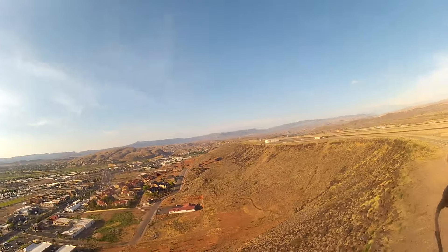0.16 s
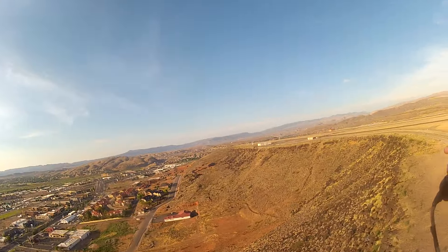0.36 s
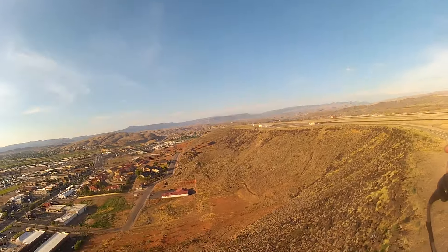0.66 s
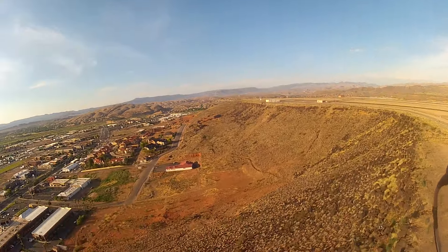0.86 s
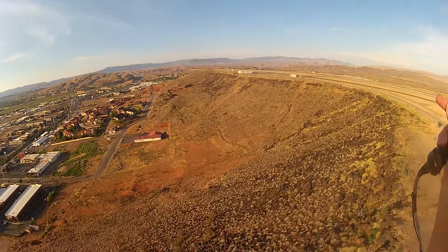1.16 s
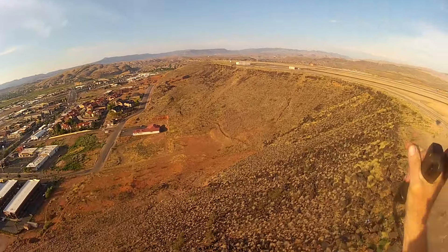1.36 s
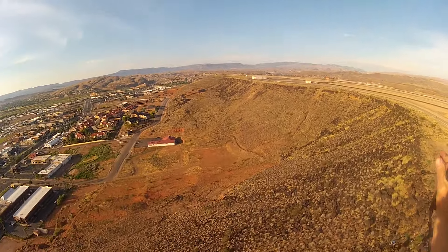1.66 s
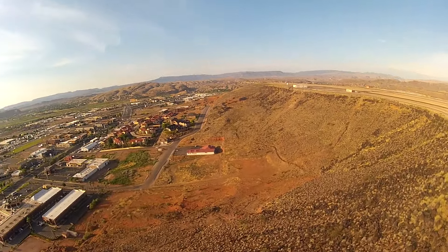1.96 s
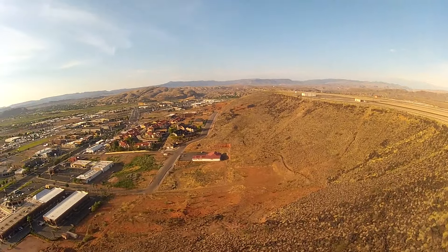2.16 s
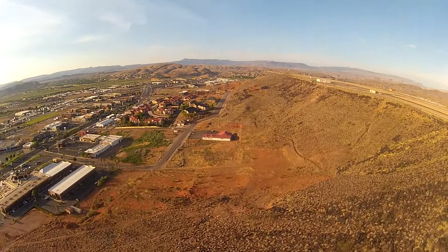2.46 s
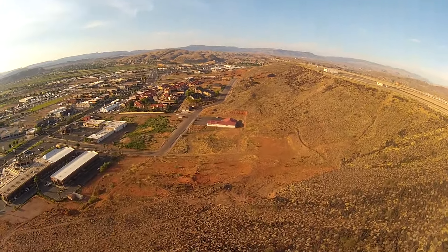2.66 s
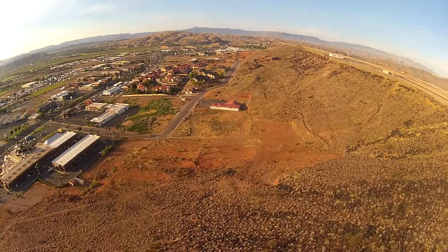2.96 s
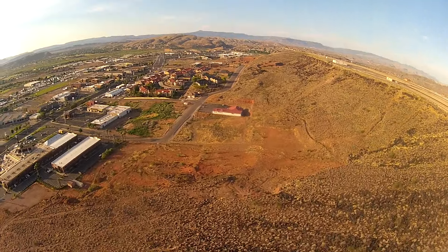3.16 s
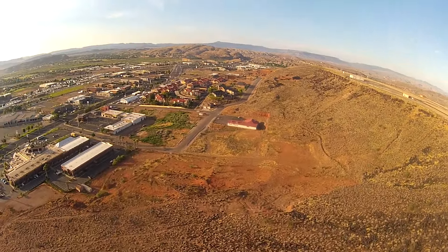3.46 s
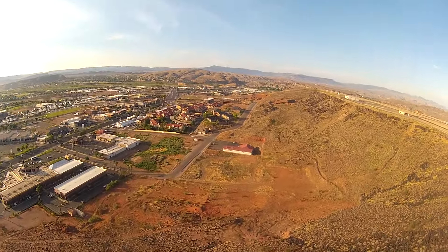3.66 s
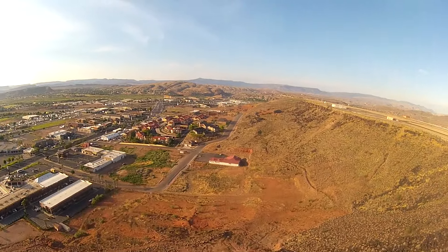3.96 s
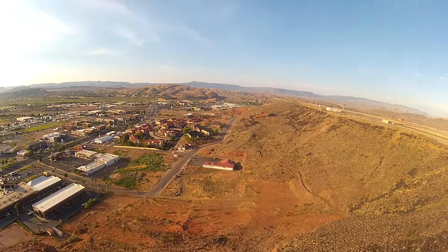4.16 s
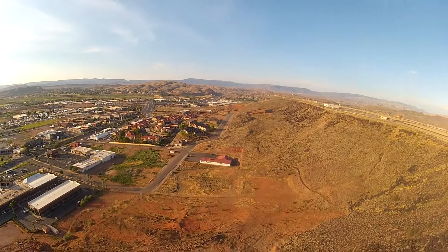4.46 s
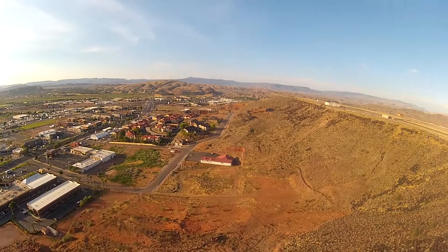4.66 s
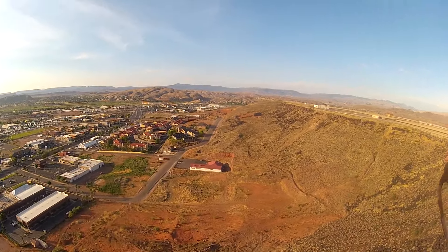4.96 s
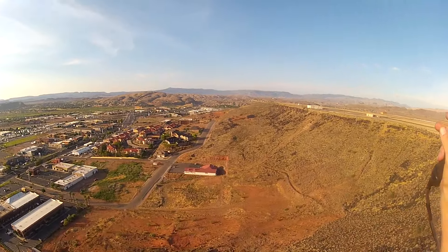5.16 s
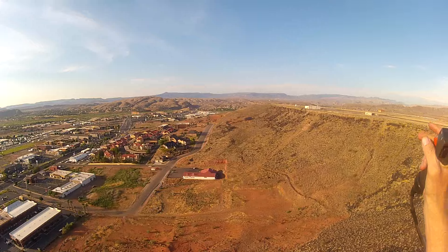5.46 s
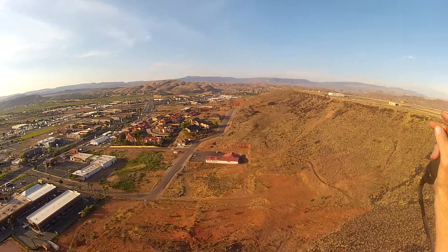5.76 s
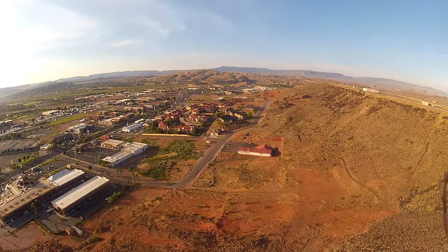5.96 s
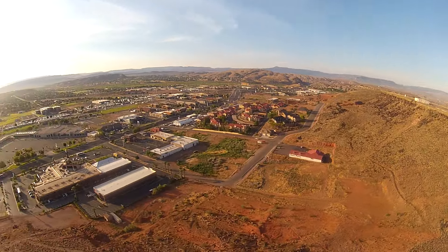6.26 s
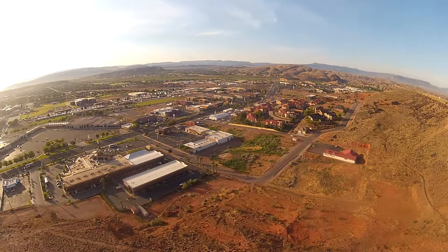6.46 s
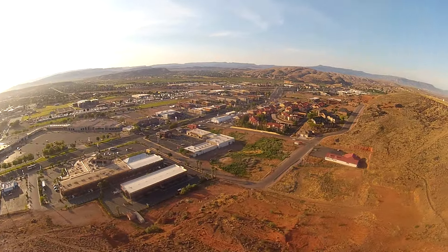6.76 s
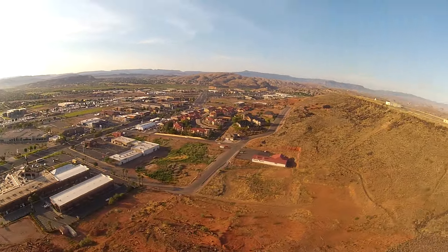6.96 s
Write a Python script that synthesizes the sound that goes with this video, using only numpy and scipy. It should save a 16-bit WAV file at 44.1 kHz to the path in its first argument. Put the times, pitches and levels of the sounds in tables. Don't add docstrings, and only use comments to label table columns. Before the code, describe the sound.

High in open air, a backpack engine and propeller buzz loudly and close, then sag in pitch and cut out. Blade beats slow from a drone to a rough flutter and fade. What remains is much quieter: lumpy low wind thumping on a small camera, airy hiss, uneven whooshing puffs, and weak wavering tones from lines in the airflow. One faint tick comes late. The mono sound is coarse and grainy.

```python
import sys
import numpy as np
from scipy import signal
from scipy.fft import rfft, irfft, next_fast_len
from scipy.io import wavfile
from scipy.ndimage import uniform_filter1d, map_coordinates

SR = 44100
rng = np.random.default_rng(int(sys.argv[2]) if len(sys.argv) > 2 else 0)


def nominal_scale(level):
    x = np.asarray(level, float) / 20
    return 10 ** x


def store_pcm(level_fs):
    pcm = np.round(np.clip(level_fs, -1, 1) * 32767).astype(np.int16)
    wavfile.write(sys.argv[1], SR, np.atleast_2d(pcm).T)


N = 313110
T = np.arange(N) / SR

# time in seconds, blade passes in Hz, engine power in dB, blade load in dB.
SPIN_DOWN = [
    (0, 132.5, -19.5, -52),
    (.44, 125.4, -19.5, -40.5),
    (.67, 114.9, -19, -26.5),
    (.91, 103.6, -21, -28),
    (1.19, 72.93, -29.5, -36),
    (1.45, 56.17, -43.5, -40),
    (1.88, 36.9, -30, -44),
    (2.21, 28.35, -37, -45),
    (2.75, 23.72, -34, -52),
]
# multiple, level in dB.
EXHAUST_TONES = [(1, 0.5), (2, -3.5), (3, -5.5), (4, -20.5), (5, -12), (6, -15.5), (7, -32), (8, -17.5),
                 (9, -19), (10, -16), (11, -10.5), (12, -15), (13, -24), (14, -10), (15, -18.5),
                 (16, -10.5), (17, -7.5), (18, -9), (19, -10.5), (20, -13.5)]
# multiple, level in dB.
LOADED_BLADES = [(3, 3), (4, 0.5), (5, -2), (6, -12), (7, -7.5), (8, -10), (9, -8), (10, -27), (11, -15),
                 (12, -29), (13, -30)]
# multiple, level in dB.
COASTING_BLADES = [(3, 2), (4, -4), (5, -4), (6, -2), (7, -5.5), (8, -8.5), (9, -10), (10, -9.5), (11, -12),
                   (12, -13), (13, -8)]
# frequency in Hz, density in dB per Hz.
ROAR_SPECTRUM = [(60, -36), (150, -21), (400, -26), (566, -18), (690, -29), (1200, -15.5), (1500, -14),
                 (2000, -7), (2450, -1), (2620, -7.5), (2900, -17.5), (4270, -20), (5700, -30), (6000, -35)]
# frequency in Hz, density in dB per Hz.
STALL_SPECTRUM = [(60, 2), (150, -9.5), (300, 5), (600, -14), (1000, -3), (1500, -9.5), (3000, -14),
                  (4600, -21), (5300, -15), (6000, -25)]
# resonance in Hz, width in Hz, level in dB.
CASE_CAVITIES = [(594, 56, 6), (1366, 170, 9), (1650, 220, 2), (3250, 140, 3.5), (4220, 130, -1)]
# start in seconds, peak in dB, ring in Hz, decay by 60 dB in seconds.
BUCKLE_TICKS = [
    (0.0164, -18, 4130, 0.02),
    (0.0992, -22, 4220, 0.015),
    (0.3518, -34, 4246, 0.02),
    (0.8744, -13, 4370, 0.013),
    (0.9415, -7, 4500, 0.011),
    (5.573, -27, 5300, 0.018),
]
# time in seconds, turbulence in dB, air speed in dB.
AIR_FLOW = [(1.2, -31, -46.5), (1.35, -36, -47.5), (1.75, -38, -52.5), (2.04, -30.5, -53),
            (2.33, -39, -51.5), (2.45, -33.5, -57), (2.95, -34, -61), (3.5, -32.5, -63.5),
            (4, -35.5, -57.5), (4.15, -31, -57.5), (4.6, -30.5, -58), (5.02, -32.5, -58),
            (5.25, -30, -55.5), (5.74, -35.5, -55), (5.9, -29, -57.5), (6.3, -31, -49.5), (6.8, -31, -50.5),
            (7.1, -34, -54)]
# start in seconds, rise in seconds, hold in seconds, level in dB.
PORT_PUFFS = [(1.8, .55, .46, -32), (2.803, .03, 0.099, -40.5), (2.97, 0.27, 0.43, -36),
              (3.183, 0.032, 0.034, -39), (3.38, .06, 0.11, -46), (3.562, 0.072, 0.13, -31.5),
              (4.546, .1, 0.19, -42.5), (5.29, .1, .25, -46.5), (5.748, 0.098, .02, -38),
              (5.894, 0.024, 0.021, -35), (5.981, 0.11, 0.366, -36), (6.15, 0.067, 0.024, -33.5),
              (6.303, 0.051, 0.052, -24.5), (6.874, 0.1, 0.036, -30.5)]
# frequency in Hz, density in dB per Hz.
BUFFET_SPECTRUM = [(8, -20), (30, -23), (45, -15.5), (63, -6.5), (97, -5), (113, -0.5), (135, -4.5),
                   (165, -6.5), (195, 0.5), (230, -6.5), (310, -15), (400, -24), (600, -71)]
# frequency in Hz, density in dB per Hz.
HISS_SPECTRUM = [(250, -11.5), (400, -8.5), (500, -7.5), (800, -3), (1800, -5.5), (2100, -0.5), (2700, -15),
                 (2900, -12), (4000, -32.5)]
# frequency in Hz, density in dB per Hz.
FIZZ_SPECTRUM = [(2400, -30), (3000, -3), (3700, -1), (4000, -5.5), (4900, -6.5), (5900, -9.5), (6100, -60)]
# frequency in Hz, width in Hz, level in dB.
PORT_MODES = [(2100, 210, 1), (2326, 270, 0), (2556, 296, 1.5), (3250, 420, -16), (4500, 130, -19.5),
              (4780, 200, -20)]
# time in seconds, pitch in Hz, level in dB.
MAIN_LINE = [
    (3.55, 670, -65),
    (3.78, 703, -48),
    (4.3, 823, -45),
    (4.6, 887, -42.5),
    (5.1, 902, -45),
    (5.5, 881, -49),
    (5.9, 861, -45),
    (6.4, 846, -46.5),
    (6.6, 855, -65),
]
# start in seconds, length in seconds, pitch in Hz, glide in Hz per second, level in dB.
OTHER_LINES = [
    (1.8, 2.1, 618, 0, -52),
    (6.43, .6, 780, -90, -45),
    (5.1, .8, 1175, 5, -51),
    (5.3, .6, 615, -10, -52),
]

GEAR = 0.729
MOTOR_SAMPLES = 3 * SR
FULL_HZ, IDLE_LOAD_DB = 130, -49
CRANK_DB, BITE_DB = -5, -1
BLADE_DB, BLADE_BY_LOAD, BLADE_BY_SPEED = -31, 0.084, 0.17
STALL_DB, STALL_BY_LOAD, STALL_BY_SPEED = -37, 0.38, 1.15
FRAME_HZ, FRAME_WIDTH_HZ, FRAME_DB = 96, 16, 9
DEAD_HZ, DEAD_WIDTH_HZ, DEAD_DB = 74, 7, -9
CUT_S, CUT_DB = 0.93, -7
FEATHER_S, FEATHER_DB = 2.08, -9
CALM_DB = -56
HISS_DB, HISS_BY_SPEED, HISS_BY_PUFF_DB = -43, 0.2, -20
PORT_DB, PORT_BY_SPEED, SPILL_DB = -47.5, 1.25, -23.5
RISE_DB, FALL_DB_PER_S = 11.5, 293
EDGE_S = 0.12


def unit(x):
    return x / np.sqrt(np.mean(x ** 2) + 1e-20)


def along(points, hz):
    f, v = np.transpose(points)
    return np.interp(np.log(hz + 1), np.log(f + 1), v)


def curves(rows):
    s, *cols = np.transpose(rows)
    return [np.interp(T, s, c) for c in cols]


def fade(start, length):
    return np.clip((T - start) / abs(length), 0, 1)


def wobble(rate):
    return map_coordinates(rng.standard_normal(int(N * 80 / SR) + 4), [T * min(rate, 80)])


def filtered(x, response):
    m = next_fast_len(N + 8192)
    return irfft(rfft(x, m) * response(np.fft.rfftfreq(m, 1 / SR)), m)[:N]


def peaks(modes, hz):
    return np.sqrt(sum(nominal_scale(2 * db) / (1 + (2 * (hz - c) / w) ** 2) ** 2 for c, w, db in modes))


def case(hz):
    return np.sqrt(1 + peaks(CASE_CAVITIES, hz) ** 2)


def rush(response, patchy_db):
    z = signal.stft(rng.standard_normal(N), nperseg=512)[2]
    field = uniform_filter1d(rng.standard_normal(z.shape), size=4, axis=0)
    field = uniform_filter1d(field, size=8, axis=1)
    patchy = signal.istft(z * nominal_scale(patchy_db * unit(field)), nperseg=512)[1][:N]
    return unit(filtered(patchy, response))


def stack(turns, orders, smear, spread):
    def slow(rate):
        return np.interp(T[:MOTOR_SAMPLES] * rate, np.arange(100), rng.standard_normal(100))

    tones = 0
    for k, db in orders:
        level = nominal_scale(db[:MOTOR_SAMPLES] + 1.86 * slow(13.44))
        wander = k * smear[:MOTOR_SAMPLES] * slow(25.02)
        tones = tones + level * np.cos(2 * np.pi * k * turns[:MOTOR_SAMPLES] + wander + spread * k * k)
    return np.sqrt(2) * np.pad(tones, (0, N - MOTOR_SAMPLES))


def roar(crank, crank_hz):
    since = (crank % 1) / crank_hz * SR + 2.6 * wobble(80)
    locked = map_coordinates(rng.standard_normal((60, 2500)), [T * 7, since], order=1)
    share = 0.35
    air = np.sqrt(share) * unit(locked) + np.sqrt(1 - share) * rush(lambda hz: 1, patchy_db=0.4)
    depth = 0.76 - 0.25 * fade(0.48, 0.06)

    def swell(lag):
        return nominal_scale(1.0 * wobble(75)) * np.exp(depth * np.cos(2 * np.pi * crank - lag))

    def colour(hz):
        return nominal_scale(along(ROAR_SPECTRUM, hz)) * case(hz)

    pipe = filtered(air * swell(3.68), lambda hz: colour(hz) * (hz < 2950))
    fins = filtered(air * swell(2.3), lambda hz: colour(hz) * (hz >= 2950))
    return (pipe + fins) / np.std((pipe + fins)[:SR])


def motor():
    blade_hz, roar_db, slap_db = curves(SPIN_DOWN)
    speed_db = 20 * np.log10(blade_hz / FULL_HZ)
    load_db = slap_db - IDLE_LOAD_DB
    blade = np.cumsum(blade_hz) / SR
    crank = GEAR * blade

    blade_db = BLADE_DB + BLADE_BY_LOAD * load_db + BLADE_BY_SPEED * speed_db
    blade_db = blade_db + FEATHER_DB * fade(FEATHER_S, 0.1)
    blade_db = blade_db + FRAME_DB * np.exp(-((blade_hz - FRAME_HZ) / FRAME_WIDTH_HZ) ** 2)
    dead_db = DEAD_DB * np.exp(-((blade_hz - DEAD_HZ) / DEAD_WIDTH_HZ) ** 2)
    blade_db, slap_db = blade_db + dead_db, slap_db + 0.5 * dead_db
    crank_db = roar_db + CRANK_DB + CUT_DB * fade(CUT_S, 0.06)
    bite_db = BITE_DB - 9 * fade(1.4, 0.43)
    stall_db = STALL_DB + STALL_BY_LOAD * load_db + STALL_BY_SPEED * speed_db

    uneven = 0.04 + 0.22 * fade(0.95, 0.35)
    firing_orders = [(k, crank_db + db + bite_db * (k > 3.5)) for k, db in EXHAUST_TONES]
    firing = stack(crank, firing_orders, uneven, spread=-0.55)
    swing_orders = [(1, blade_db), (2, 0.5 * (blade_db + slap_db) - 0.5)]
    swing = stack(blade, swing_orders, 0.34 * uneven, spread=0.06)
    coast = fade(0.913, 0.059)
    slap_orders = [(k, slap_db + db + coast * (late_db - db))
                   for (k, db), (_, late_db) in zip(LOADED_BLADES, COASTING_BLADES)]
    slap = stack(blade, slap_orders, 0.9 * uneven, spread=0.14)
    stall = rush(lambda hz: nominal_scale(along(STALL_SPECTRUM, hz)) * case(hz), patchy_db=1.7)
    stall = unit(np.exp(0.84 * np.cos(2 * np.pi * blade - 0.3)) * stall)

    tones = (firing + swing + slap) * (1 - fade(2.68, 0.37))
    combustion = nominal_scale(roar_db + 1.5) * roar(crank, GEAR * blade_hz) * (1 - fade(1.086, 0.41))
    return tones + combustion + nominal_scale(stall_db + 7.5) * stall * (1 - fade(1.78, 0.8))


def ticks():
    out, t = np.zeros(N + SR), T[:1300]
    for s, db, hz, t60 in BUCKLE_TICKS:
        crack = rng.standard_normal(len(t)) * nominal_scale(-60 * t / 0.0049)
        modes = np.sin(2 * np.pi * hz * t) + 0.44 * np.sin(2 * np.pi * 0.87 * hz * t)
        out[round(s * SR):][:len(t)] += nominal_scale(db - 7) * (nominal_scale(-60 * t / t60) * modes + crack)
    return filtered(out[:N], lambda hz: (hz < 5950) * np.clip(hz / 4500, 0, 1) ** 4)


def puffs():
    t = T[::64]
    power = 0
    for s, rise, hold, db in PORT_PUFFS:
        climb_db = RISE_DB * np.clip((s + rise - t) / abs(rise), 0, None)
        drop_db = FALL_DB_PER_S * np.clip(t - s - rise - hold, 0, None)
        power = power + nominal_scale(2 * (db - climb_db - drop_db))
    return np.interp(T, t, power)


def wind():
    buffet_db, speed_db = curves(AIR_FLOW)
    blown = puffs()
    faster_db = speed_db - CALM_DB
    hiss_db = HISS_DB + HISS_BY_SPEED * faster_db + 1.33 * wobble(9)
    hiss_gain = np.sqrt(nominal_scale(2 * hiss_db) + blown * nominal_scale(2 * HISS_BY_PUFF_DB))
    port_gain = np.sqrt(blown + nominal_scale(2 * (PORT_DB + PORT_BY_SPEED * faster_db))) * nominal_scale(1.35 * wobble(14))
    fizz_gain = np.sqrt(blown * nominal_scale(2 * SPILL_DB) + nominal_scale(2 * speed_db))

    buffet = rush(lambda hz: nominal_scale(along(BUFFET_SPECTRUM, hz)), patchy_db=0.2)
    hiss = rush(lambda hz: nominal_scale(along(HISS_SPECTRUM, hz)) * case(hz), patchy_db=0.0)
    fizz = rush(lambda hz: nominal_scale(along(FIZZ_SPECTRUM, hz)) * case(hz), patchy_db=1.5)
    fizz = unit(nominal_scale(0.54 * wobble(45)) * fizz)
    port = rush(lambda hz: peaks(PORT_MODES, hz), patchy_db=1.0)
    port = unit(nominal_scale(1.3 * wobble(70)) * port)

    lumpy = nominal_scale(buffet_db + 1.0 * wobble(8.5)) * buffet
    total = lumpy + nominal_scale(3.5) * hiss_gain * hiss + port_gain * port + nominal_scale(2.0) * fizz_gain * fizz
    return fade(0.75, 0.27) * total


def sing(hz, purity):
    def sway(width_hz):
        return unit(filtered(rng.standard_normal(N), lambda f: peaks([(0, width_hz, 0)], f)))

    share = np.clip(purity, 0, 1)
    a, b = [np.sqrt(1 - share) * sway(140) + np.sqrt(share) * sway(29) for _ in range(2)]
    phase = 2 * np.pi * np.cumsum(hz * (1 + 0.011 * wobble(6))) / SR
    return nominal_scale(1.8 * wobble(8)) * (a * np.cos(phase) + b * np.sin(phase))


def strings():
    main_hz, main_db = curves(MAIN_LINE)
    out = nominal_scale(main_db) * sing(main_hz, purity=0.15)
    for s, length, hz, glide, db in OTHER_LINES:
        swell = fade(s, EDGE_S) * (1 - fade(s + length - EDGE_S, EDGE_S))
        out = out + nominal_scale(db) * swell * sing(hz + glide * (T - s), purity=0.7)
    return out


def scene():
    return (motor() + ticks() + wind() + strings())[None]


def low_pass(x):
    return signal.sosfilt(signal.butter(12, 15950, fs=SR, output="sos"), x)


def record(dry):
    slow = signal.resample_poly(dry[0], 40, 147)
    held = signal.resample_poly(np.repeat(slow, 4), 147, 160)
    held = filtered(held[:N], lambda hz: hz < 15320)
    return low_pass(held[None])


dry = scene()
out = record(dry)
store_pcm(out)
```